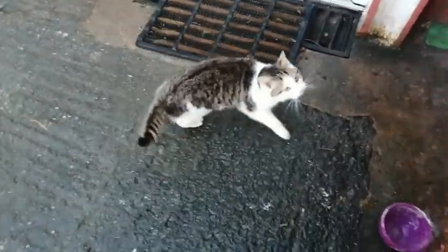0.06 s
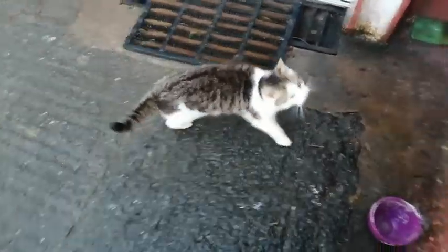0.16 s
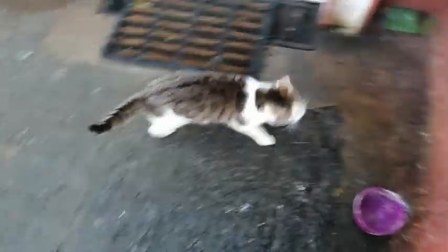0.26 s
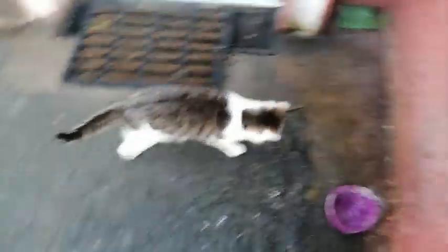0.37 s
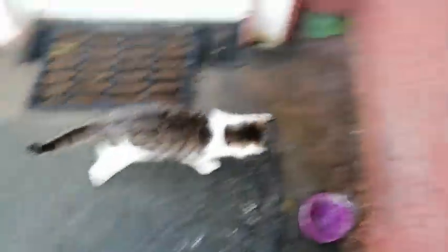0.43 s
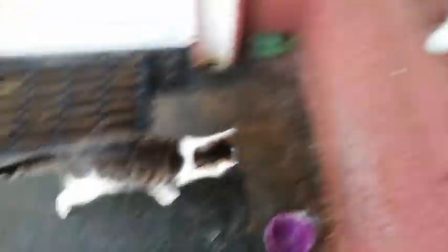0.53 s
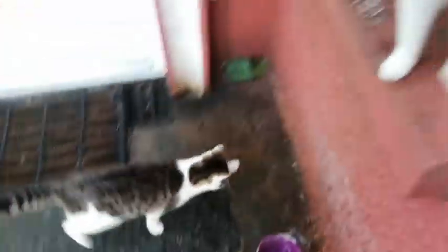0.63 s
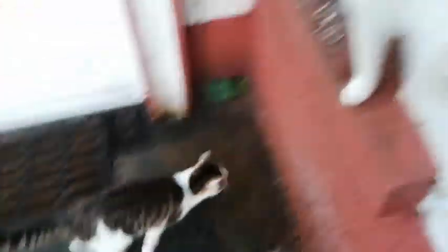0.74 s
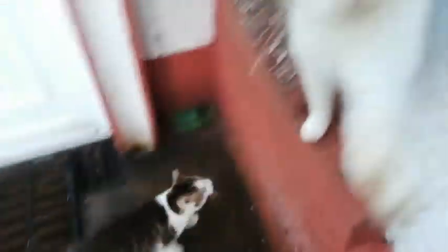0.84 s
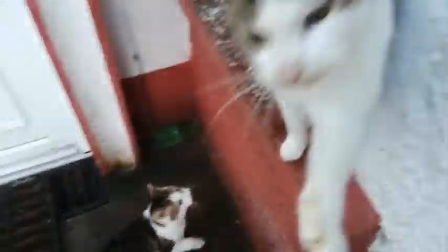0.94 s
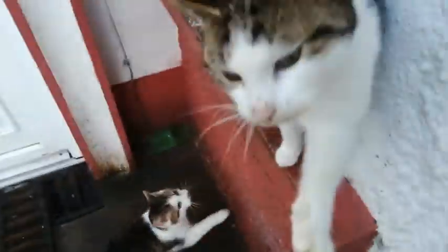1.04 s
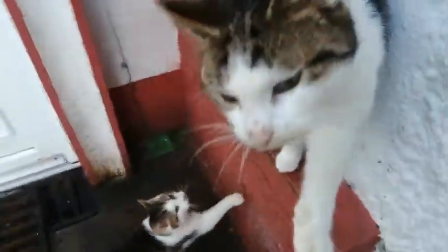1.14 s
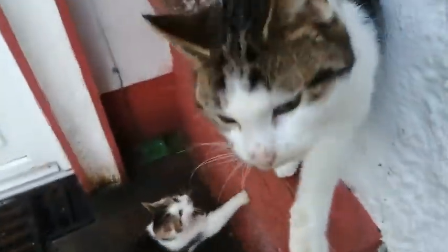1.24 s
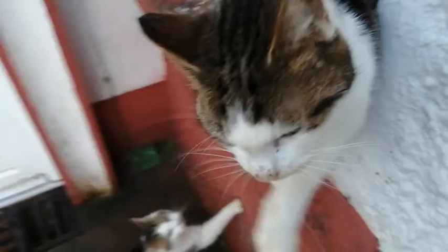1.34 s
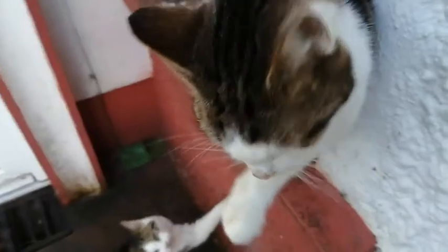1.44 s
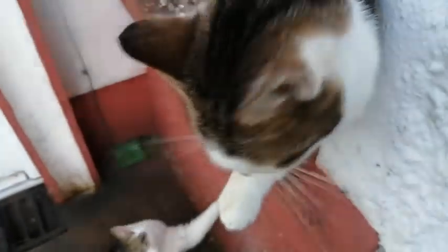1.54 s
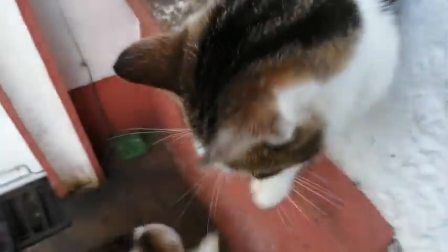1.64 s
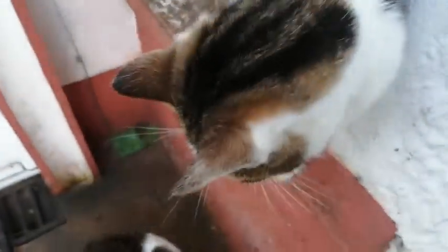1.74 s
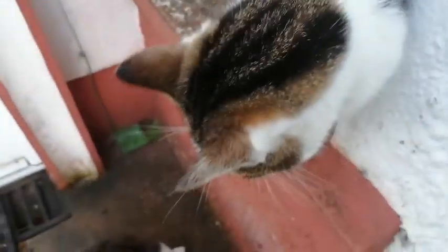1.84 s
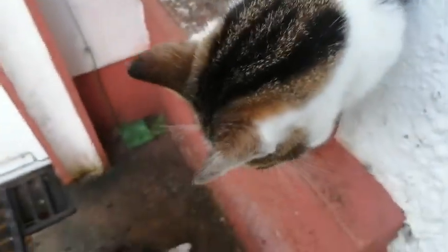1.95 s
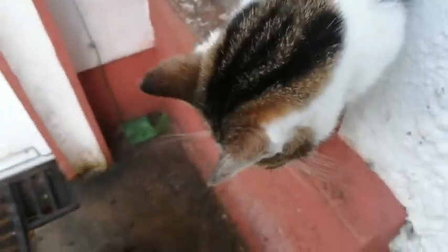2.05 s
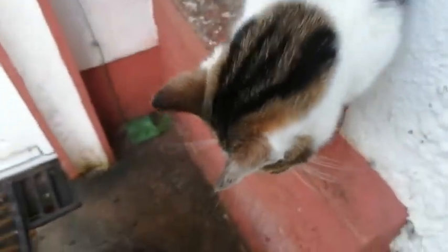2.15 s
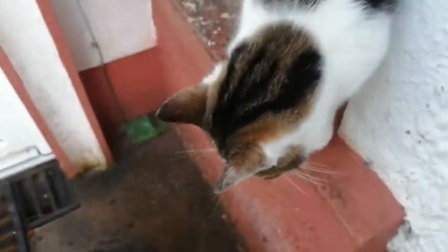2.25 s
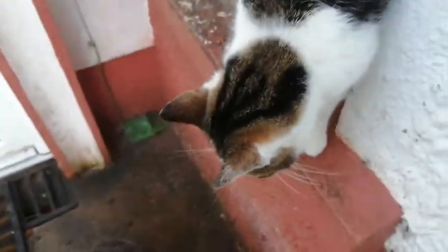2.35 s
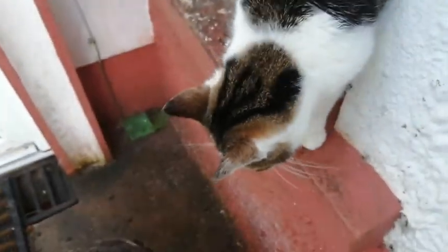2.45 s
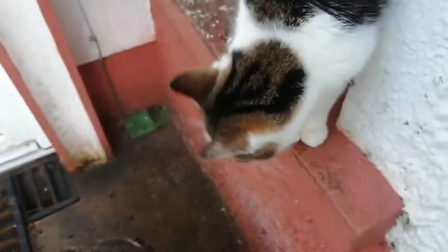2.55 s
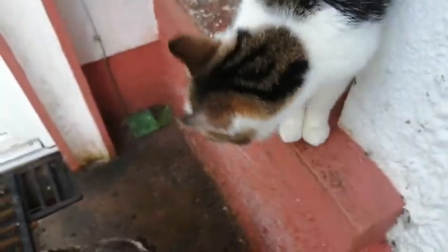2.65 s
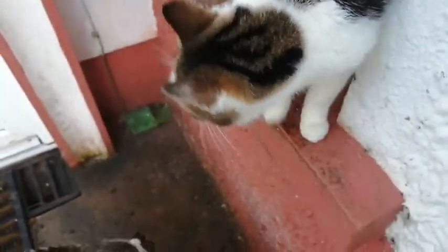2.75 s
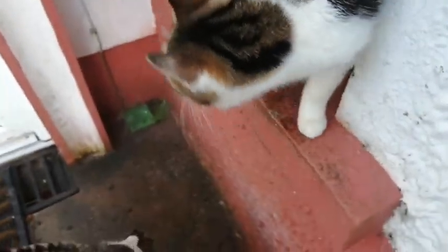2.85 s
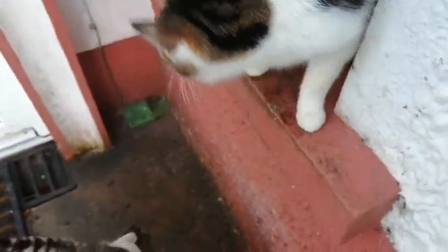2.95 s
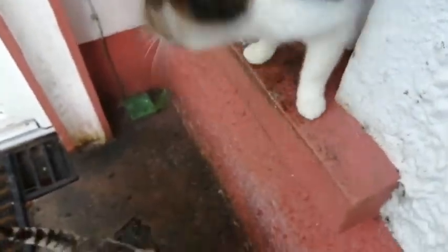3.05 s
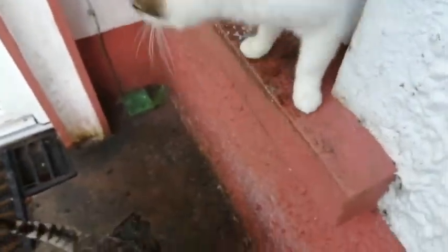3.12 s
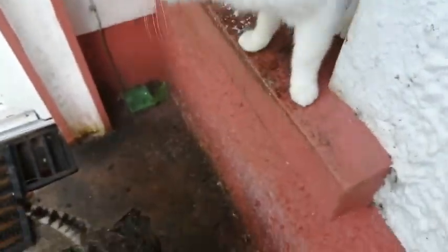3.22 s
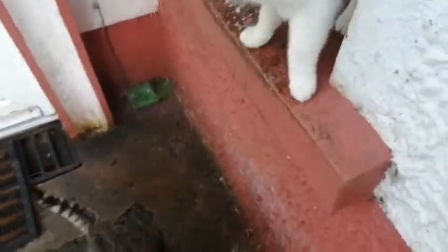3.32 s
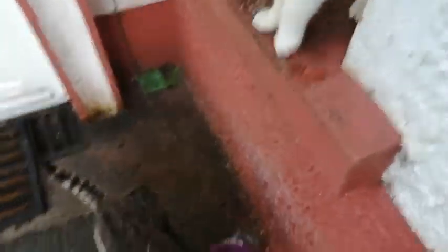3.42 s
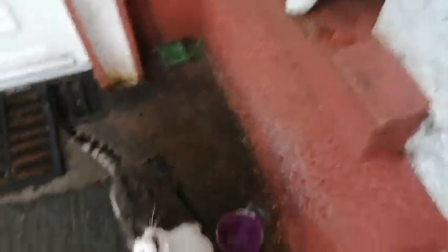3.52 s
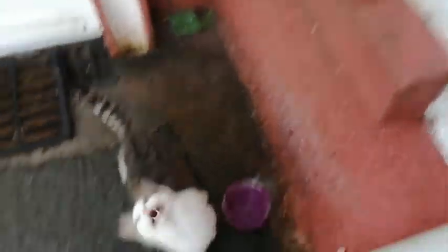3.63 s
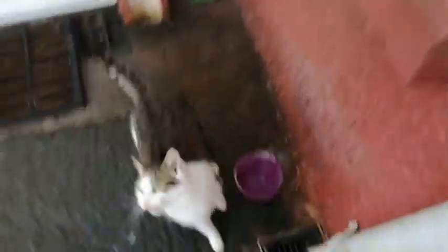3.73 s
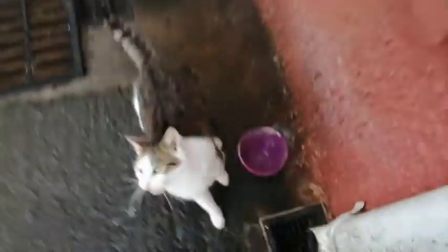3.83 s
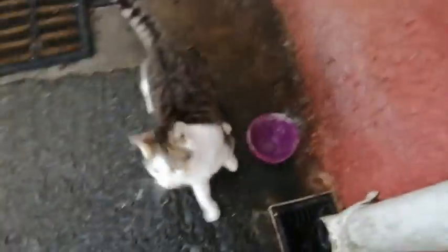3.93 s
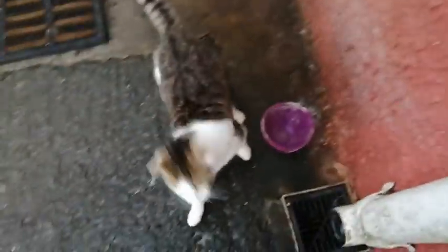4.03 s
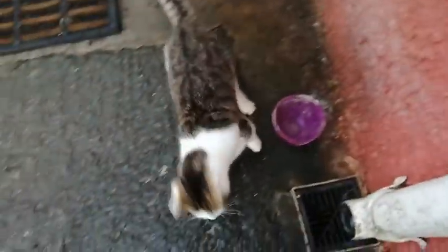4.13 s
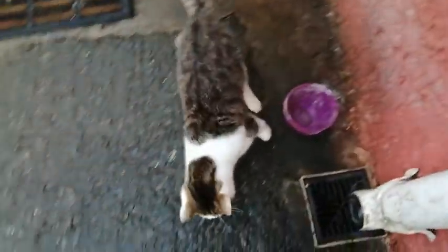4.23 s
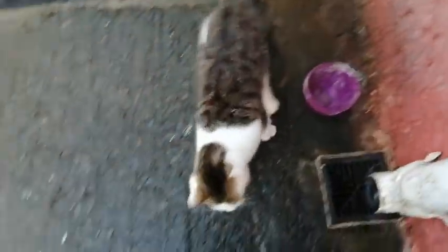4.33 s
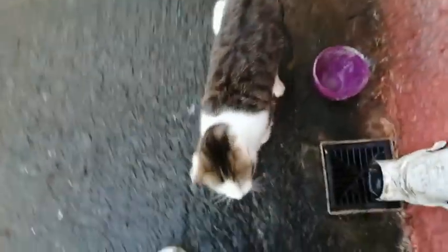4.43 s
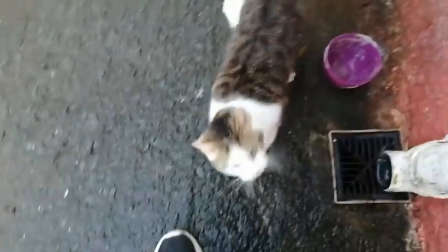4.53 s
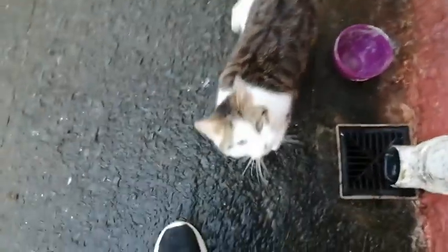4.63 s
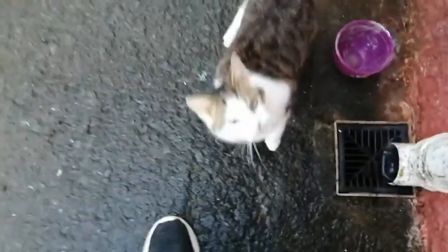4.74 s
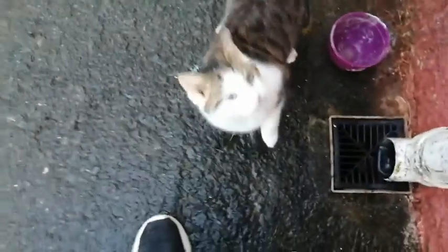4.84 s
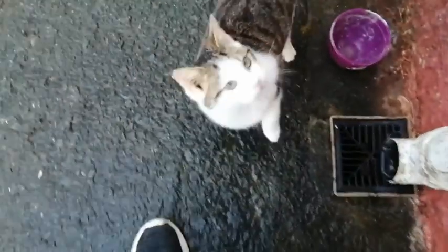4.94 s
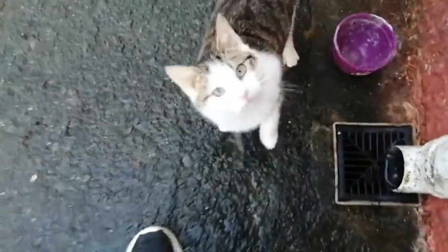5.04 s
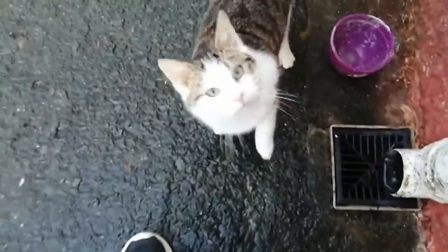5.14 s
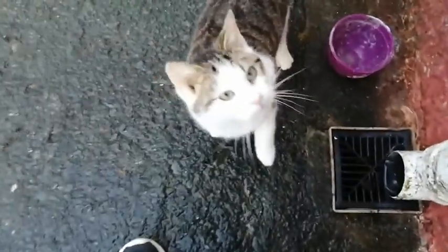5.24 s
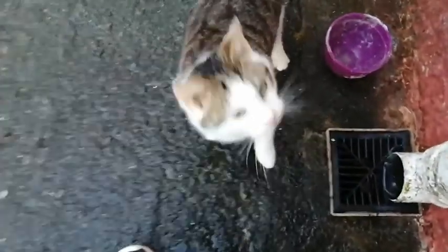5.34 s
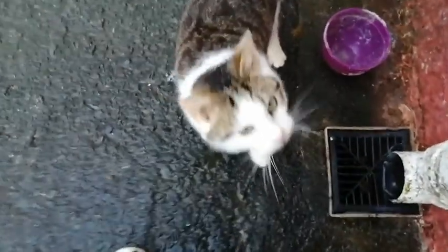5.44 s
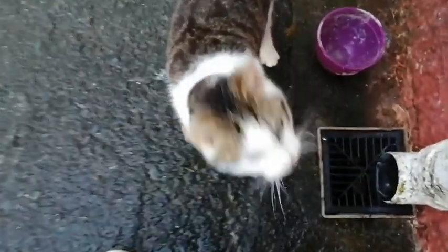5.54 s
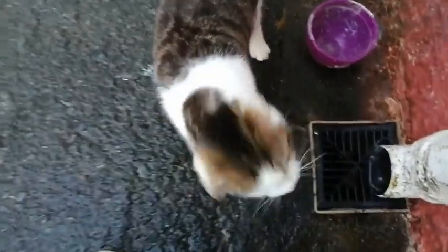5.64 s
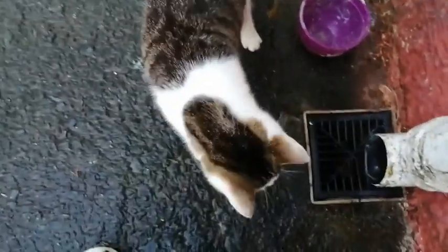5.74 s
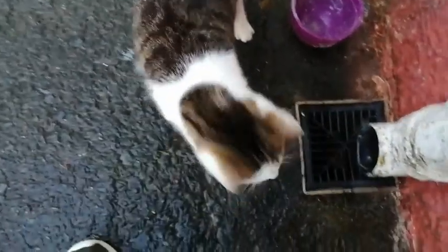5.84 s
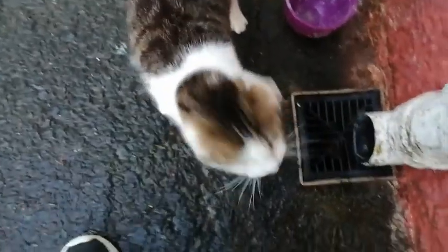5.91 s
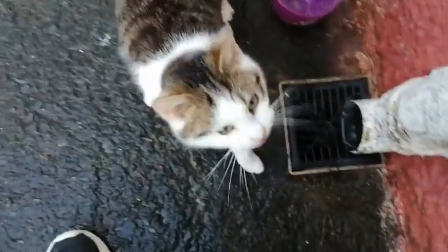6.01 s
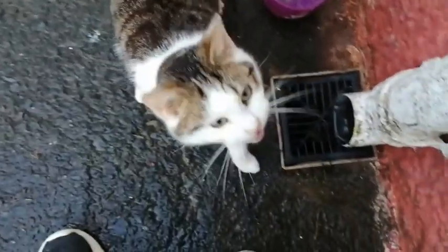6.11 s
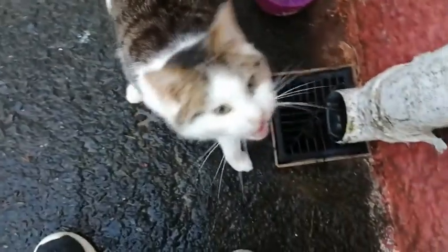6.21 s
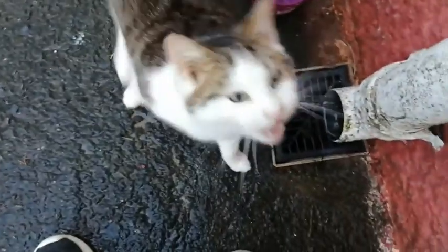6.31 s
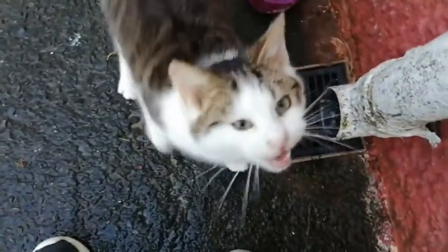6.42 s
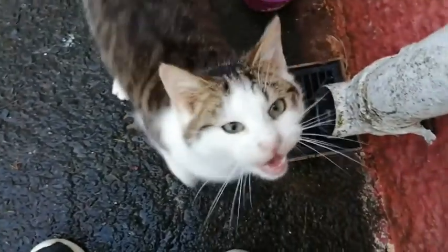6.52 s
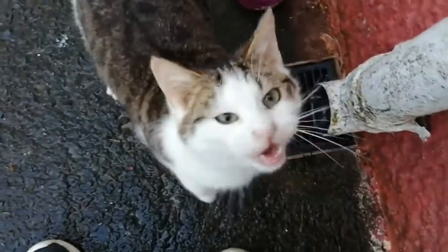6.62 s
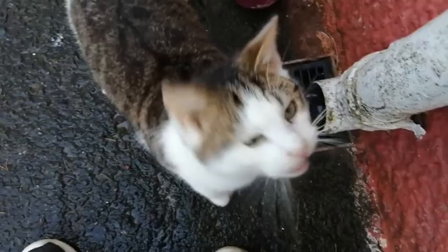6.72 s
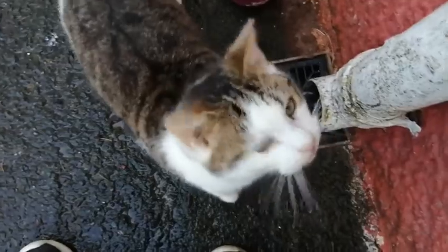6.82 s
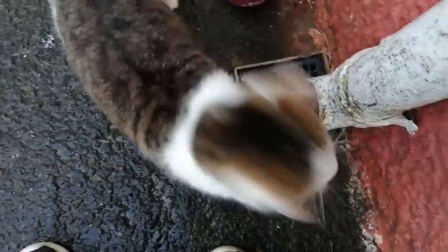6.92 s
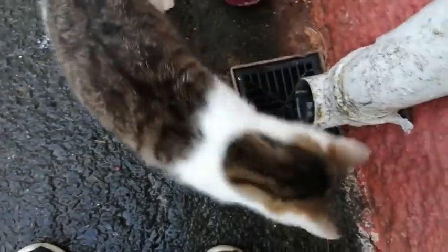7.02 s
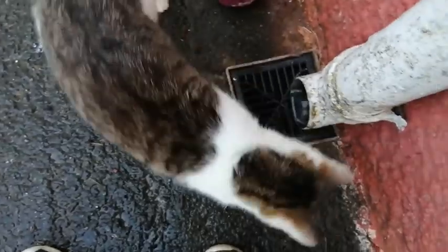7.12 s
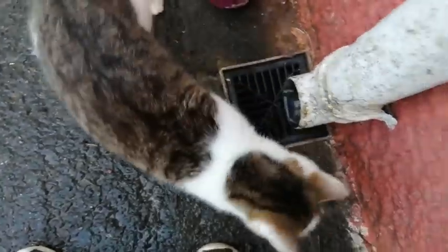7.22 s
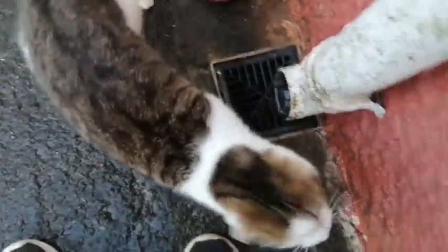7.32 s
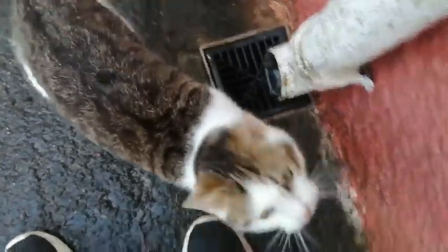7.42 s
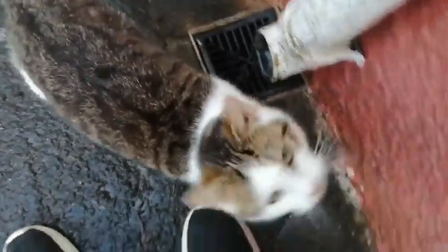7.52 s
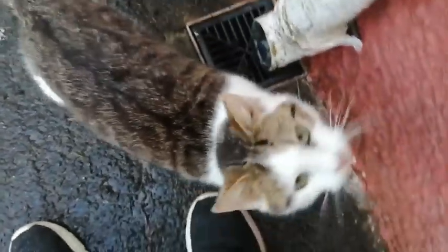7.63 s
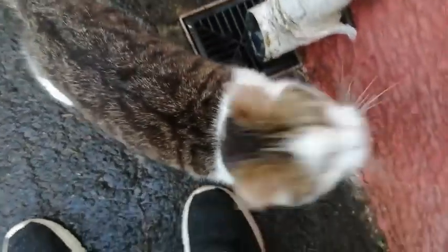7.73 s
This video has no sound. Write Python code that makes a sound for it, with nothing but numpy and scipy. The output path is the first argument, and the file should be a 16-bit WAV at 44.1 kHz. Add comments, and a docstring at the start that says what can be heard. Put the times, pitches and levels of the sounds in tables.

```python
"""Two loud, shrill meows, each begun and ended by a hiss of air, follow two closed-mouth moans and a small mew.
Farm cats beg in a wet yard, right under a hand-held phone with a left and a right microphone port.
Calls are sums of gliding harmonics with leaking air; sniffs are swells of coloured noise.
Noise snaps make ticks and the crackle that ends the last meow; paws pad as damped tones; far off a bird sings.
A faint far cat reaches the yard by echo alone; handling, rumble, rustle and hiss are shaped noise."""
import sys
import numpy as np
from scipy import signal
from scipy.fft import rfft, irfft, next_fast_len
from scipy.io import wavfile
from scipy.ndimage import uniform_filter1d, map_coordinates

SR = 44100
rng = np.random.default_rng(int(sys.argv[2]) if len(sys.argv) > 2 else 0)


def wav_record(signal):
    """Record a signal, one row per channel, as 16-bit PCM in the file named by sys.argv[1]."""
    frames = np.transpose(np.atleast_2d(signal))
    bounded = np.clip(frames, -1, 1)
    # unit amplitude maps onto the largest positive 16-bit level
    quanta = np.round(bounded * 32767).astype(np.int16)
    wavfile.write(sys.argv[1], SR, quanta)


N = 342646
T = np.arange(N) / SR

# Loud meows at close range: attack_s, mouth_opening_s, mouth_closing_s, fundamental_db, sag_db_per_s,
# second_harmonic_db, second_harmonic_push_db (extra at the start), overtones_db, last_puff_db, left_lead_rad
LOUD_MEOWS = [(.0095, .2, 0.27, -31.5, 5, -41.5, -2.5, -53, -52.5, .75),
              (0.0068, .08, .16, -27.5, -1, -40, 8, -45.5, -43.5, 0.22)]
# Each loud meow scoops down and sags: time_s, pitch_hz
MEOW_PITCH = [
    [(3.377, 1070), (3.39, 1064), (3.415, 997.6), (3.53, 973), (3.57, 952), (3.66, 932.4), (3.735, 949.4),
     (3.87, 931.7), (3.92, 960)],
    [(6.206, 1077), (6.222, 1009), (6.275, 959), (6.315, 953), (6.36, 960.8), (6.475, 970.7), (6.56, 959),
     (6.825, 939), (6.862, 997)],
]
# Throat colour of each meow's overtones: frequency_hz, level_db
THROAT_COLOURS = [
    [(2820, -18.5), (2900, -14), (2970, 4.5), (3200, -4), (3800, -20.5), (4750, -14), (5700, 3),
     (7600, -0.5), (8600, -16), (10500, -32), (14500, -31)],
    [(2900, -7.5), (3850, -13.5), (4800, -19.5), (5800, 1.5), (7700, -0.5), (8650, -27), (9650, -12),
     (11500, -38), (12600, -18.5), (14500, -27)],
]
# The shrill seventh harmonic of each meow: time_s, level_db
SEVENTH_HARMONIC = [
    [(3.39, -50), (3.48, -42), (3.53, -36.5), (3.735, -27), (3.8, -37), (3.89, -57.5)],
    [(6.21, -52.5), (6.29, -40.5), (6.39, -46.5), (6.465, -33), (6.54, -53), (6.7, -45), (6.77, -35.5),
     (6.85, -43)],
]
# Left-right balance of the meows' fundamental as the head turns: time_s, balance_db
HEAD_TURN_BALANCE = [(3.39, -11.5), (3.65, 2.5), (3.77, 3.5), (3.81, -6.5), (6.7, -4), (6.83, 3.5)]
# Air leaking through a meow: frequency_hz, level_db
LEAKING_AIR = [(700, -19.5), (1150, 0), (1550, 10.5), (2300, -28.5), (4500, -30.5), (6000, 5.5), (6800, 19),
               (8500, -11), (11500, -24), (13300, -16), (15500, -25)]
# Closed-mouth moans: time_s, pitch_hz, level_db
MOANS = [
    [(0, 518, -30), (0.015, 488, -40), (0.042, 630, -49), (0.07, 585, -46), (0.135, 584, -43.5),
     (0.155, 523, -39.5), (0.172, 470, -58)],
    [(0.235, 436, -59.5), (0.258, 488, -40.5), (0.285, 508.3, -36.5), (.385, 496, -35), (.54, 478, -44),
     (.58, 480, -62.5), (.72, 416, -61)],
]
# Flutter of each moan, the first rough, the second smooth: flutter_db
MOAN_FLUTTER = [2, 0.5]
# Small mew: time_s, pitch_hz, level_db, mouth_resonance_hz
MEW = [(1.769, 716, -60, 1650), (1.788, 674, -43, 1440), (1.845, 745, -52, 1770), (1.875, 730, -51.5, 1300),
       (1.93, 696, -66, 640), (1.97, 759, -58, 1330), (2.045, 724, -51.5, 890), (2.122, 644, -47.5, 330)]
# Throat whistle just before the last meow: time_s, pitch_hz, level_db
SQUEAK = [(6.113, 2430, -67.5), (6.122, 2360, -55.5), (6.17, 2250, -52.5), (6.18, 2100, -44.5),
          (6.21, 2055, -39.5)]
# Sniffs at the microphone: start_s, length_s, level_db, breadth (0 = thin hiss, 1 = open rasp)
SNIFFS = [(1.5, 0.13, -65.5, 0.52), (1.654, 0.12, -67.5, 0.17), (2.082, 0.13, -64, 0.62),
          (2.55, 0.14, -62.5, 0.78), (7.03, 0.29, -74.5, .05), (7.648, 0.25, -70, .1)]
# Air through a narrow mouth: frequency_hz, level_db
THIN_HISS = [(2650, -11), (4500, -24.5), (5650, -7.5), (6250, 5.5), (7020, 7.5), (7540, -2), (8130, -6),
             (11000, -27), (14300, -57), (22000, -120)]
# Air through an open mouth: frequency_hz, level_db
OPEN_RASP = [(410, -53.5), (700, -28.5), (884, -5), (1060, -37), (1510, -10), (2280, -13.5), (3160, -9.5),
             (4150, -15), (4480, -16), (6790, 0), (8690, -20), (11700, -15), (15600, -15.5)]
# Ticks of claws and grit, and the two crackles that end the last meow:
# start_s, peak_db, centre_hz, body_db (over the snap)
TICKS_AND_CRACKLES = [(0.2652, -45, 6570, -5), (0.7414, -51, 5580, -16), (1.0209, -47.5, 6540, -15),
                      (1.4237, -60.5, 5040, 14.5), (1.6796, -38, 5730, -10), (1.7014, -35.5, 6540, -12),
                      (1.71, -25.5, 6100, -11.5), (1.7163, -40.5, 5400, -22), (2.815, -42, 6830, -9),
                      (4.4742, -38, 7540, -27.5), (6.8349, -32.5, 7500, -13), (6.8492, -27.5, 6560, 0.5),
                      (7.2981, -38, 6250, -14.5)]
# The firmest pats of paws: start_s, peak_db, pitch_hz
FIRM_PATS = [(1.068, -51.5, 408), (2.121, -41, 545), (2.136, -40, 220), (2.145, -38.5, 430),
             (2.771, -44, 184), (2.816, -52, 902), (5.645, -44, 556), (5.714, -42, 174),
             (7.326, -46.5, 587), (7.381, -45, 279), (7.547, -40.5, 320)]
# Shuffles of fur and feet: middle_s, half_length_s, level_db
SHUFFLES = [(.39, 0.28, -70.5), (2.17, .14, -62.5), (4.201, .3, -68.5), (5.561, 0.25, -65),
            (5.97, 0.12, -64), (7.498, .22, -66)]
# Bumps of the hand on the phone: start_s, peak_db
BUMPS = [(5.712, -35), (5.78, -29), (5.856, -31), (6.996, -33), (7.143, -33.5), (7.294, -44.5)]
# The hand shifting on the phone: time_s, level_db
HANDLING = [(5.55, -80.5), (5.75, -51.5), (6.0, -58), (6.5, -54), (6.7, -63.5), (7.0, -51), (7.399, -57),
            (7.77, -50)]
# The far bird's pure, arched whistles: start_s, length_s, top_pitch_hz, level_db
WHISTLES = [(4.756, 0.13, 4700, -56), (5.145, .135, 5850, -52.5)]
# The far bird's short chips: start_s, pitch_hz, level_db, glide (share of the pitch)
CHIPS = [(3.954, 3200, -63.5, -.08), (4.007, 3090, -65, -.16), (4.13, 3060, -71, .05),
         (4.468, 4840, -66, .02), (4.504, 5980, -69, .16), (4.547, 5820, -59, -.14),
         (4.636, 5950, -55, .09), (4.952, 5700, -51, -.13), (5.02, 5760, -58, 0), (5.06, 4760, -63.5, -.1),
         (5.264, 5410, -54, -.11)]
# A faint answering call from a far cat: time_s, pitch_hz, level_db
FAR_CALL = [(.36, 828, -59), (0.48, 866, -64), (.74, 686, -66.5)]
# Colour of the low rumble: frequency_hz, level_db
RUMBLE_COLOUR = [(12, -29), (20, -0.5), (32, 3), (43, -14), (59, -2), (75, 0.5), (98, -11), (152, -11),
                 (300, -19), (390, -46), (660, -120)]
# Colour of the rustle: frequency_hz, level_db
RUSTLE_COLOUR = [(110, -17.5), (180, -1.5), (233, -11), (327, -0.5), (502, -5.5), (583, -5.5), (735, -10),
                 (1300, -48.5), (1690, -63), (2860, -120)]
# Colour of the even hiss: frequency_hz, level_db
HISS_COLOUR = [(470, -17), (800, -2.5), (1000, -2), (1370, -7.5), (1770, -8), (1910, -9.5), (3180, -11.5),
               (3690, -18), (6950, -10), (7870, -20.5), (9140, -20.5), (13300, -19.5), (14700, -17),
               (15600, -15.5)]
# Likeness of noise at the two ports: frequency_hz, likeness (1 = same, 0 = unrelated)
PORT_LIKENESS = [(60, 0.8), (180, 0.7), (550, 0.26), (1650, -0.1), (4970, 0.1), (15000, 0)]

RELEASE_S, EDGE_DB = 0.0073, 28  # the voice rises from and falls to this far below its level
EDGE_STEEPER = 2.7  # the upper harmonics come later and leave sooner than the fundamental
SHUT_DB, SPENT_DB = 11, 11.5  # a shut mouth dulls the overtones; the fundamental fades as it closes
PUSH_S = 0.16  # length of the first push, which shifts the second harmonic's level
SKIRT_DB_PER_HZ = .017  # loss of a mew's harmonic with its distance from the mouth resonance
LEAD_IN_S, LEAD_IN_LENGTH_S, LEAD_IN_DB = 0.31, 0.48, -63  # thin hiss: time before the meow, length, level
LAST_PUFF_EARLY_S, LAST_PUFF_S = .022, .12  # the rasp that ends a meow overlaps the voice
BREAK_EARLY_S, BREAK_S, BREAK_DB = .04, .045, -1  # thin hiss as the voice breaks off; level over the rasp's
LIGHT_PAT_DB, LIGHT_PAT_HZ = 11.5, 369  # typical peak over the shuffle's level, typical pitch
WHISTLE_ARCH, CHIP_S = 0.0394, .044  # the ends of a whistle lie this share lower; length of a chip
RUMBLE_DB, RUSTLE_DB = -60, -73.5  # steady levels before any swell
TOP_HZ = 15720  # the phone's band limit


def amp(db):
    """Decibels to gain."""
    return 10 ** (np.asarray(db) / 20)


def unit(x):
    """Scale to rms 1."""
    return x / np.sqrt(np.mean(x ** 2) + 1e-20)


def along(points, hz):
    """Read (frequency, value) points on a log frequency axis."""
    f, v = np.transpose(points)
    return np.interp(np.log(hz + 1), np.log(f + 1), v)


def over_time(points, t):
    """Read (time, value) points at the times t."""
    return np.interp(t, *np.transpose(points))


def pan(db):
    """Left and right gains, left over right in dB, whose mean is 1."""
    left = amp(np.atleast_1d(db))
    return 2 * np.array([left, np.ones_like(left)]) / (1 + left)


def wobble(t, rate):
    """A smooth random curve over the times t, rate knots a second."""
    knot = (t - t[0]) * rate
    return map_coordinates(rng.standard_normal(int(knot[-1]) + 4), [knot + 1])


def filtered(x, response):
    """Apply a response of frequency to x."""
    n = x.shape[-1]
    padded = next_fast_len(n + 8192)
    spectrum = rfft(x, padded) * response(np.fft.rfftfreq(padded, 1 / SR))
    return irfft(spectrum, padded)[..., :n]


def noise(colour, size, alike=PORT_LIKENESS):
    """Coloured noise at both ports, scaled so that their middle has rms 1."""
    def mid_side_response(hz):
        turn = np.arccos(np.clip(along(alike, hz), -1, 1)) / 2
        return amp(along(colour, hz)) * [np.cos(turn), np.sin(turn)]

    mid, side = filtered(rng.standard_normal((2, size)), mid_side_response)
    return np.array([mid + side, mid - side]) / np.std(mid)


def add(out, s, x):
    """Mix x into out from time s on."""
    start = max(0, round(s * SR))
    out[:, start:start + x.shape[-1]] += x[..., :N - start]


def call(rows, jitter):
    """Times, soft gate, vocal-fold phase, jittered pitch and control curves of one call."""
    s, *columns = np.transpose(rows)
    t = np.arange(s[0], s[-1], 1 / SR)
    pitch, *controls = [np.interp(t, s, column) for column in columns]
    pitch = pitch * (1 + jitter * wobble(t, 70) + jitter * wobble(t, 400))
    gate = np.clip(np.minimum(t - t[0], t[-1] - t) / 0.0022, 0, 1)
    phase = 2 * np.pi * np.cumsum(pitch) / SR
    return t, gate, phase, pitch, controls


def harmonic(t, phase, lead, sway_db, flutter_db):
    """One harmonic at both ports; it fades in and out as the head turns among ground reflections."""
    fading = np.array([wobble(t, 12), wobble(t, 12.9)])
    offset = rng.uniform(0, 2 * np.pi) + np.array([[lead], [-lead]]) / 2
    level = amp(sway_db * fading + flutter_db * wobble(t, 90))
    return np.sqrt(2) * level * np.sin(phase + offset)


def meows():
    """High harmonics brighten with the open mouth; the seventh rings on a sharp resonance; air leaks between."""
    out = np.zeros((2, N))
    for rows, meow, seventh, throat in zip(MEOW_PITCH, LOUD_MEOWS, SEVENTH_HARMONIC, THROAT_COLOURS):
        (attack_s, opening_s, closing_s, first_db, sag_db_per_s,
         second_db, push_db, overtones_db, _, lead) = meow
        t, gate, phase, pitch, _ = call(rows, jitter=0.0021)
        age, left = t - t[0], t[-1] - t
        edge = -EDGE_DB * (np.exp(-age / attack_s) + np.exp(-left / RELEASE_S))
        unopened = np.clip(1 - age / opening_s, 0, 1)
        closed = np.clip(1 - left / closing_s, 0, 1)

        # level curves in dB
        first = first_db + edge - sag_db_per_s * age - SPENT_DB * closed
        push = push_db * np.exp(-(age / PUSH_S) ** 2)
        second = second_db + EDGE_STEEPER * edge + push - 3 * closed
        overtones = overtones_db + EDGE_STEEPER * edge - SHUT_DB * (unopened + closed)
        ring = over_time(seventh, t) + edge

        low = amp(first) * harmonic(t, phase, lead, sway_db=.25, flutter_db=.15)
        low = low * pan(over_time(HEAD_TURN_BALANCE, t))
        high = amp(second) * harmonic(t, 2 * phase, 1.1, sway_db=1.2, flutter_db=.4)
        for k in range(3, 17):
            rings = k == 7
            if rings:
                db = ring + 1.5 * wobble(t, 55)
            else:
                db = overtones + along(throat, k * pitch) + 1.5 * wobble(t, 30)
            # uneven fold closures blur the upper harmonics most
            shiver = (k / 15.5) ** 3 * wobble(t, 1000)
            overtone_lead = rng.uniform(.8, 1.8)
            sway_db = 1 if rings else 2.7
            high += amp(db) * harmonic(t, k * phase + shiver, overtone_lead, sway_db, flutter_db=1.6)

        # the leak pulses with the vocal folds and follows the mean of the upper levels
        leak = noise(LEAKING_AIR, len(t)) * (1 + .5 * np.sin(phase)) * amp(1.8 * wobble(t, 35))
        high += amp(-15 + (second + overtones + ring) / 3) * leak
        add(out, t[0], gate * (low + high * pan(-11.0)))
    return out


def squeak():
    """Just before the last meow the tight throat whistles down onto its second harmonic."""
    out = np.zeros((2, N))
    t, gate, phase, _, (db,) = call(SQUEAK, jitter=0.0058)
    tone = np.sin(phase) + amp(-30) * np.sin(2 * phase) + amp(-14.5) * np.sin(3 * phase)
    add(out, t[0], gate * amp(db + 2.9 * wobble(t, 120)) * tone * pan(-10.5))
    return out


def moans(calls, flutters_db):
    """With the mouth shut, almost only the fundamental gets out, with a low murmur of noise."""
    out = np.zeros((2, N))
    murmur_colour = [(250, -18.5), (500, 5), (850, -4.5), (1400, -31.5), (3000, -36.5)]
    for rows, flutter_db in zip(calls, flutters_db):
        t, gate, phase, _, (db,) = call(rows, jitter=0.009)
        tone = harmonic(t, phase, 0, sway_db=.3, flutter_db=flutter_db)
        tone = tone + amp(-40) * np.sin(2 * phase)
        murmur = amp(-28.0) * noise(murmur_colour, len(t))
        add(out, t[0], gate * amp(db) * (tone + murmur) * pan(-6))
    return out


def mew():
    """The mouth opens twice; its resonance picks out the nearest harmonic, at last the fundamental."""
    out = np.zeros((2, N))
    t, gate, phase, pitch, (db, mouth_hz) = call(MEW, jitter=0.0075)
    tone = 0
    for k in range(1, 4):
        loss_db = SKIRT_DB_PER_HZ * np.abs(k * pitch - mouth_hz)
        tone = tone + amp(db - loss_db) * harmonic(t, k * phase, 0.39, sway_db=0.5, flutter_db=2.0)
    add(out, t[0], gate * tone * pan(-12.5))
    return out


def puff(length, db, breadth, skew):
    """Unvoiced air: a narrow mouth hisses on its resonance, an open one rasps broadly; a low skew peaks early."""
    u = np.linspace(0, 1, int(length * SR))
    share = np.clip(breadth, 0, 1)
    air = np.sqrt(1 - share) * noise(THIN_HISS, len(u)) + np.sqrt(share) * noise(OPEN_RASP, len(u))
    swell = np.abs(np.sin(np.pi * u ** skew)) ** 1.1
    return amp(db + 1.5 * wobble(u * length, 200)) * swell * air * pan(-4.0)


def puffs():
    """A cat sniffs at the microphone; each loud meow starts in a thin hiss and ends in a rasp."""
    out = np.zeros((2, N))
    for s, length, db, breadth in SNIFFS:
        add(out, s, puff(length, db, breadth, skew=0.76))
    for rows, (*_, puff_db, _) in zip(MEOW_PITCH, LOUD_MEOWS):
        start, end = rows[0][0], rows[-1][0]
        add(out, start - LEAD_IN_S, puff(LEAD_IN_LENGTH_S, LEAD_IN_DB, breadth=.07, skew=.83))
        add(out, end - LAST_PUFF_EARLY_S, puff(LAST_PUFF_S, puff_db, breadth=0.81, skew=.72))
        add(out, end - BREAK_EARLY_S, puff(BREAK_S, puff_db + BREAK_DB, breadth=.15, skew=1))
    return out


def ticks_and_crackles():
    """Each tick or crackle is a sharp, bright snap with a little body and a short scatter after it."""
    out, t = np.zeros((2, N)), np.arange(SR // 10) / SR
    body_colour = [(1000, -22), (1950, 13.5), (2800, -15.0), (7000, -42.5)]
    # a fast fall of 60 dB in 7.5 ms over a weak one in 80 ms
    decay = (amp(-60 * t / .0075) + amp(-20) * amp(-60 * t / .08)) * (1 - np.exp(-t / .00012))
    for s, db, hz, body_db in TICKS_AND_CRACKLES:
        snap_colour = [(hz * 0.7, -24), (hz * 0.85, -2), (hz * 1.25, -2), (hz * 1.45, -22), (hz * 3, -32)]
        snap = noise(snap_colour, len(t))
        body = noise(body_colour, len(t))
        add(out, s, amp(db - 8.0) * decay * (snap + amp(body_db) * body) * pan(-3.5))
    return out


def light_pats():
    """Three light pats scattered over each shuffle, with random force and pitch."""
    pats = []
    for s, half, db in SHUFFLES:
        for when, force, size in rng.uniform(-1, 1, size=(3, 3)):
            pats.append((s + half * when, db + LIGHT_PAT_DB + 3 * force, LIGHT_PAT_HZ * 1.4 ** size))
    return pats


def paw_pats():
    """Soft contacts give a few damped cycles and a brush of noise."""
    out, t = np.zeros((2, N)), np.arange(SR // 6) / SR
    brush_colour = [(80, 6.5), (250, -6), (600, -7.5), (1000, -24.0), (3000, -36.5), (9000, -53.0)]
    for s, db, hz in list(FIRM_PATS) + light_pats():
        knock = np.sin(2 * np.pi * hz * t) * amp(-60 * t / 0.047)
        brush = noise(brush_colour, len(t)) * amp(-60 * t / 0.23)
        onset = 1 - np.exp(-t / 0.0017)
        add(out, s, amp(db + 2.5) * onset * (knock + amp(-10.5) * brush) * pan(-7.5))
    return out


def phone_bumps():
    """Bumps of the hand on the phone give one deep push, almost only at the right port."""
    out, t = np.zeros((2, N)), np.arange(SR // 6) / SR
    push = np.sin(2 * np.pi * 72 * t) * amp(-60 * t / 0.049) * (1 - np.exp(-t / 0.006))
    for s, db in BUMPS:
        add(out, s, amp(db + 8) * push * pan(-38))
    return out


def handling():
    """Fingers press on the case near the right port and make it boom very low."""
    boom_colour = [(10, -13.5), (25, -3), (50, -2.5), (100, -12.5), (300, -50.0), (1000, -120)]
    level = amp(over_time(HANDLING, T) + 2.5 * wobble(T, 17))
    return level * noise(boom_colour, N) * pan(-18.5)


def note(pitch, db, buzz):
    """One thin bird note along a pitch curve; buzz is the random share of the pitch."""
    u = np.linspace(0, 1, len(pitch))
    pitch = pitch * (1 + buzz * wobble(T[:len(u)], 901))
    swell = np.abs(np.sin(np.pi * u)) ** 0.52
    return amp(db) * swell * np.sin(2 * np.pi * np.cumsum(pitch) / SR)


def bird():
    """Far bird: long whistles arch and are pure; short chips glide and buzz."""
    out = np.zeros((2, N))
    for s, length, hz, db in WHISTLES:
        arch = 1 - WHISTLE_ARCH * np.linspace(-1, 1, int(length * SR)) ** 2
        add(out, s, note(hz * arch, db, buzz=0.0072))
    for s, hz, db, glide in CHIPS:
        slide = 1 + glide * np.linspace(-.5, .5, int(CHIP_S * SR))
        add(out, s, note(hz * slide, db, buzz=0.033))
    return out * pan(-4)


def echo(x, t60):
    """The diffuse answer of walls and yard: a noise tail that falls 60 dB in t60 seconds."""
    t = np.arange(SR * 2 // 3) / SR
    tail = rng.standard_normal((2, len(t))) * amp(-60 * t / t60) * (1 - np.exp(-t / 0.024))
    return signal.fftconvolve(x, tail / np.linalg.norm(tail[0]), axes=1)[:, :N]


def background():
    """Low, lumpy rumble, a patchy rustle that swells with each shuffle, and an even hiss."""
    rumble_level = amp(RUMBLE_DB + 1.6 * wobble(T, 15) + 1.8 * wobble(T, 4.6))
    rumble = rumble_level * noise(RUMBLE_COLOUR, N) * pan(-4.5)

    # random patches in time and frequency, alike at both ports
    cells = signal.stft(noise(RUSTLE_COLOUR, N), nperseg=1024)[2]
    patches = uniform_filter1d(rng.standard_normal(cells.shape[1:]), size=3, axis=0)
    patches = unit(uniform_filter1d(patches, size=5, axis=1))
    patchy = signal.istft(cells * amp(2.5 * patches), nperseg=1024)[1][:, :N]
    swell_power = sum((amp(db) * np.exp(-((T - s) / half) ** 2)) ** 2 for s, half, db in SHUFFLES)
    rustle = np.sqrt(amp(RUSTLE_DB) ** 2 + swell_power) * patchy * pan(-2.0)

    hiss = amp(-70.5 + 0.72 * wobble(T, 3.96)) * noise(HISS_COLOUR, N) * pan(-3)
    return rumble + rustle + hiss


def scene():
    """The near cats are almost dry; the bird comes with wall reflections, the far cat only by them."""
    voices = meows() + squeak() + moans(MOANS, MOAN_FLUTTER) + mew() + puffs()
    near = voices + ticks_and_crackles() + paw_pats() + phone_bumps()
    song = bird()
    far_cat = moans([FAR_CALL], [0])
    far = song + amp(-2) * echo(song, t60=.36) + amp(-3) * echo(far_cat, t60=.36)
    return near + amp(-24.0) * echo(near, t60=0.19) + far + handling() + background()


def record(dry):
    """The phone keeps nothing above its band limit."""
    return filtered(dry, lambda hz: hz < TOP_HZ)


dry = scene()
out = record(dry)
wav_record(out)
```